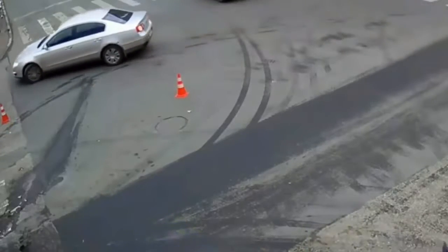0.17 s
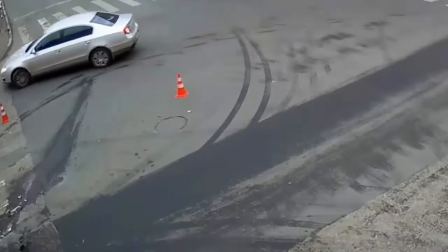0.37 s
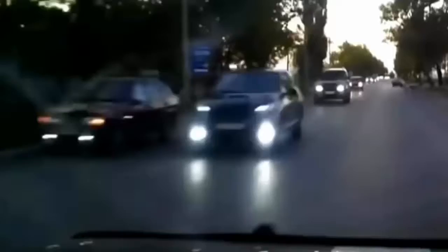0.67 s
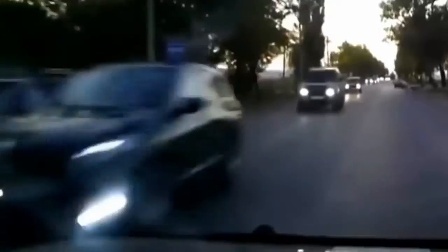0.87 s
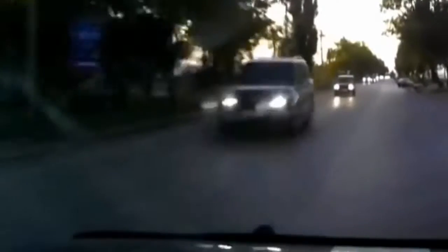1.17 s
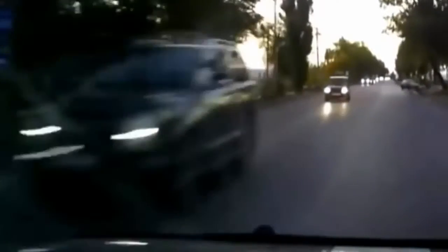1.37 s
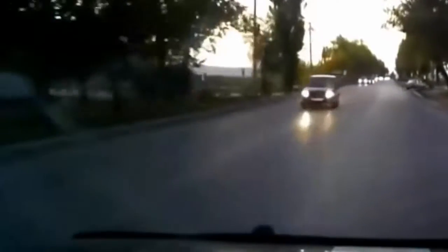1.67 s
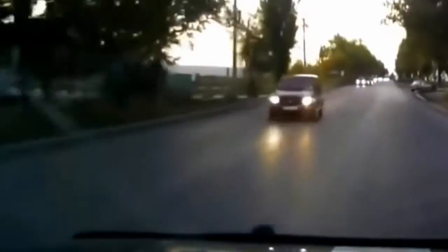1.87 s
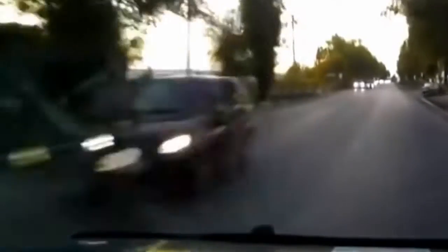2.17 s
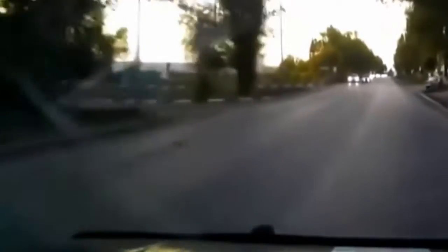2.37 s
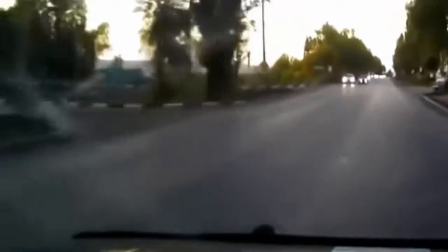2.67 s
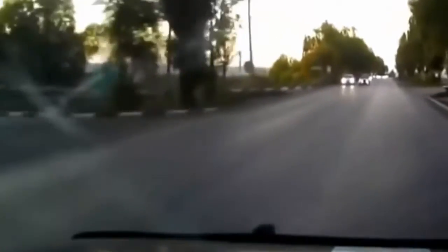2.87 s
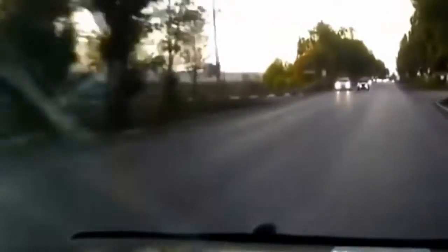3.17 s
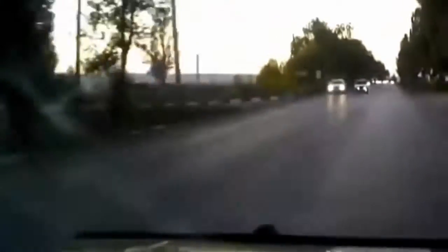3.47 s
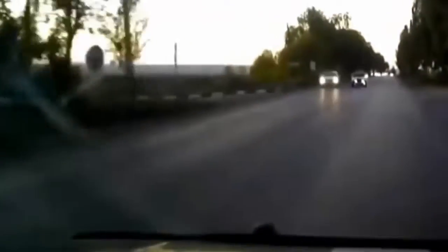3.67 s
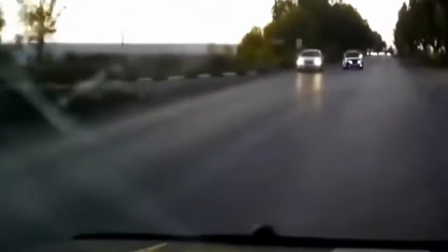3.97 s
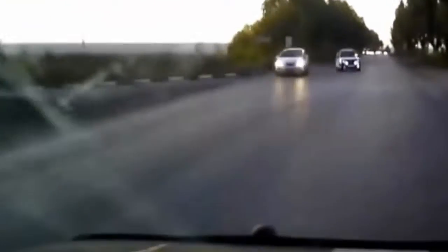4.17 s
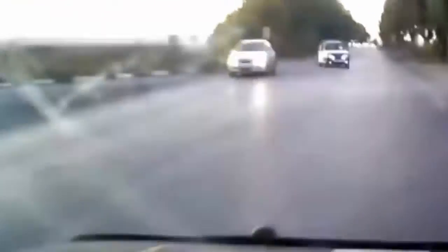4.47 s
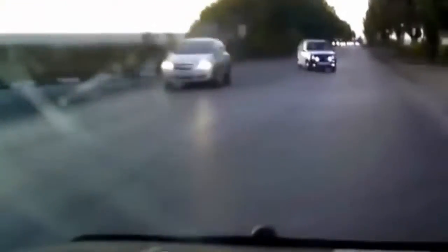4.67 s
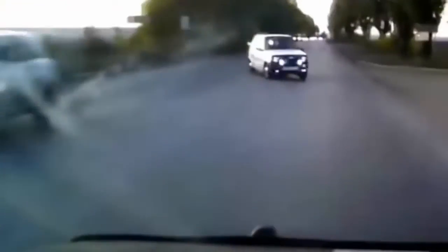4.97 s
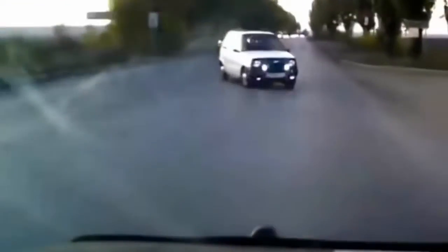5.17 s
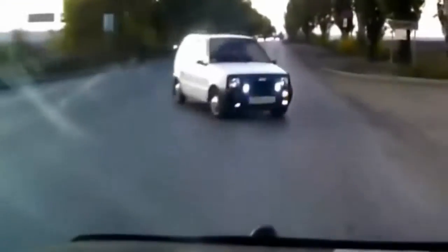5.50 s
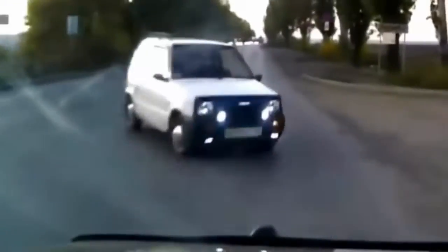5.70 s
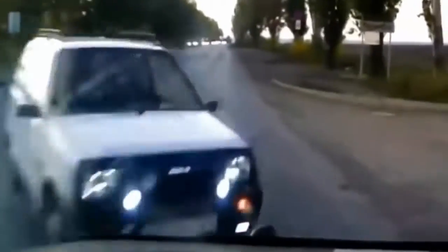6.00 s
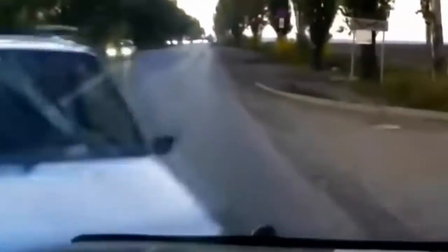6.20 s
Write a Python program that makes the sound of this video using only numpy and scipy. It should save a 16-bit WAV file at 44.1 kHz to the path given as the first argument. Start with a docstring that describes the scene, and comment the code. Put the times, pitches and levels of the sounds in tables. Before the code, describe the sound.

After brief silence, a droning car cabin; hard braking brings loud knocks, ticks, a two-note horn and howling tyres, ending in a distorted crash.

```python
"""Inside a moving car, heard from the dashboard: engine boom, road roar and buzzing trim after a short silence.
The driver brakes hard: loose things knock, sharp ticks crowd in, grit crackles, a two-note horn blares
and the tyres howl. An oncoming car hits the front and overloads the microphone. Engine, horn and tyres
are sums of sines with wandering pitch and level; road, ticks and scrub are coloured noise; trim, grit
and scrapes are random tiny contacts; knocks and crash are noise bursts over decaying thuds."""
import sys
import numpy as np
from scipy import signal
from scipy.fft import rfft, irfft
from scipy.io import wavfile
from scipy.ndimage import uniform_filter1d, minimum_filter1d

SR = 44100
rng = np.random.default_rng(int(sys.argv[2]) if len(sys.argv) > 2 else 0)


def transcribe(u):
    """Save the signal u as a 16-bit wav file named by the first command-line argument.

    u: samples, shape (n,) or (channels, n), limited to [-1, 1]; the rate is SR.
    q: integer samples, one column per channel.
    """
    v = np.clip(np.atleast_2d(u).T, -1, 1)
    q = np.round(v * 32767).astype(np.int16)
    wavfile.write(sys.argv[1], SR, q)


N = 279594
TIME = np.arange(N) / SR

CABIN_ON_S, IMPACT_S = 0.668, 6.26
# Steady speed until the driver lifts off, then an even slowing (share of cruising speed lost per second)
LIFT_S, SLOWING_PER_S = 3.55, 0.145
FIRING_HZ = 45.24  # at cruising speed
# First bite of the brakes
BITE_S, BITE_ATTACK_S, BITE_HOLD_S, BITE_RELEASE_S = 3.97, 0.059, 0.889, 0.048


def undb(db):
    """Decibels to gain."""
    return 10 ** (np.asarray(db) / 20)


def unit(x):
    """Scale to rms 1."""
    return x / np.sqrt(np.mean(x ** 2) + 1e-18)


def curves(table):
    """Each column of a table joined by straight lines in time."""
    seconds, *columns = np.transpose(table)
    return [np.interp(TIME, seconds, column) for column in columns]


def ramp(start, length):
    """Rises from 0 to 1."""
    return np.clip((TIME - start) / length, 0, 1)


def swell(start, length):
    """A rounded rise and fall."""
    return np.sqrt(np.abs(np.sin(np.pi * ramp(start, length))))


def swells(table):
    """Summed envelope of events given as start in seconds, length in seconds, level in dB."""
    return sum(undb(db) * swell(start, length) for start, length, db in table)


def fade(start, t60, rise):
    """Envelope of a blow: a quick rise and an exponential decay, 60 dB down after t60 seconds."""
    decay = np.exp(-np.log(1000) * np.clip((TIME - start) / t60, 0, 2))
    return ramp(start, rise) * decay


def colour(x, spectrum):
    """Causal minimum-phase filter through (Hz, dB) points; the result has rms 1."""
    hz, db = np.transpose(spectrum)
    size = 4096
    grid = np.maximum(np.fft.rfftfreq(size, 1 / SR), 1)
    cepstrum = irfft(np.log(undb(np.interp(np.log(grid), np.log(hz), db))))
    # Folding the cepstrum puts the energy of the response at its start
    cepstrum[1:size // 2] *= 2
    cepstrum[size // 2 + 1:] = 0
    response = irfft(np.exp(rfft(cepstrum)))
    return unit(signal.fftconvolve(x, response)[:len(x)])


def noise(spectrum):
    """Coloured noise of rms 1."""
    return colour(rng.standard_normal(N), spectrum)


def walk(rate):
    """Smooth random wander of rms 1, changing about rate times a second."""
    hold = max(int(SR / rate), 2)
    steps = np.repeat(rng.standard_normal(N // hold + 1), hold)
    smooth = uniform_filter1d(uniform_filter1d(steps, hold), hold)
    return unit(smooth[:N])


def contacts(per_s, scatter_db):
    """Random tiny impacts of either sign and scattered strength."""
    touching = rng.random(N) < per_s / SR
    return touching * rng.choice([-1, 1], N) * undb(scatter_db * rng.standard_normal(N))


def turn(hz):
    """Phase of an oscillator whose rate moves."""
    return 2 * np.pi * np.cumsum(hz) / SR


def firing_hz():
    """The firing rate follows the speed of the car."""
    return FIRING_HZ * (1 - SLOWING_PER_S * np.maximum(TIME - LIFT_S, 0))


def bite():
    """Envelope of the first bite of the brakes."""
    release = ramp(BITE_S + BITE_ATTACK_S + BITE_HOLD_S, BITE_RELEASE_S)
    return ramp(BITE_S, BITE_ATTACK_S) * (1 - release)


def blows(table, spectrum, rise, crackle_db):
    """Each blow is a burst of crackling contacts over the thud of one damped panel."""
    crackle = noise(spectrum) * unit(undb(crackle_db * walk(700)))
    out = 0
    for start, db, t60, thud_hz, thud_db in table:
        thud = undb(thud_db) * np.sqrt(2) * np.sin(2 * np.pi * thud_hz * (TIME - start))
        out = out + undb(db) * fade(start, t60, rise) * (crackle + thud)
    return out


def engine(engine_db=-28, waver_db=3.0, jitter=0.00418):
    """Firings drone in the cabin as engine orders that swell and sink slowly; closing the throttle quiets them."""
    # Cabin boom. Each row: multiple of the firing rate, relative level in dB, change while shifted in dB.
    boom = [(1, 0.5, -4), (1.5, -10.5, -1.5), (2, -1, 0), (3.01, 0, -.5), (4, -4.5, -2.5),
            (4.97, -1.5, 0.5), (6.02, -2, 3.5), (7.43, -2.5, -2.5), (7.95, 1.5, -5.5), (9.13, -7, 3),
            (9.94, -11.5, 8.5)]
    throttle_shut_s, off_throttle_db = 1, -15.5
    # For a while the boom leans on other orders
    shift_s, shift_back_s, shift_glide_s = 1.15, 2.88, 0.26
    shifted = ramp(shift_s, shift_glide_s) - ramp(shift_back_s, shift_glide_s)
    phase = turn(firing_hz() * (1 + jitter * walk(8)))
    orders = 0
    for multiple, db, shift_db in boom:
        level = undb(db + shift_db * shifted + waver_db * walk(4.49))
        orders = orders + level * np.sin(multiple * phase + rng.uniform(0, 2 * np.pi))
    return unit(orders) * undb(engine_db + off_throttle_db * ramp(LIFT_S, throttle_shut_s))


def road(grain_db=1.5, shake_db=0.57):
    """The road shakes the body and the tread rushes over uneven asphalt; both sink as the wheels lock."""
    # Body rumble. Each row: frequency in Hz, density in dB per Hz (only the shape counts).
    rumble_spectrum = [(20, 4), (38, 8.5), (70, 3.5), (110, 2), (220, 2), (340, 2), (430, -1.5), (520, -3),
                       (800, -35.5), (8000, -91)]
    # Tread rush. Each row: frequency in Hz, density in dB per Hz (only the shape counts).
    rush_spectrum = [(300, -4), (550, -4), (900, 1), (1150, -6), (1400, -6), (1850, -12), (2200, -17.5),
                     (2900, -24), (3700, -23), (4500, -28), (5100, -35), (7200, -40.5), (9000, -39),
                     (12500, -52.5), (15000, -65.5)]
    # Bumps that jolt the body. Each row: start in seconds, length in seconds, level in dB.
    bumps = [(4.27, 0.15, -30), (4.8, 0.14, -35), (5.38, 0.085, -29.5)]
    # An oncoming car swishes past. Each row: start in seconds, length in seconds, level in dB.
    passing = [(0.46, 0.54, -37.5)]
    rumble_db, rush_db, bite_hiss_db = -30.5, -32.5, -29.5
    lock_s, locking_s, locked_rumble_db, locked_rush_db = 4.2, 0.97, -8.5, -4.5
    locked = ramp(lock_s, locking_s)
    body = np.hypot(undb(rumble_db + locked_rumble_db * locked), swells(bumps))
    hiss = undb(bite_hiss_db) * bite() + swells(passing)
    tread = np.hypot(undb(rush_db + locked_rush_db * locked), hiss)
    rumble = noise(rumble_spectrum) * body * undb(shake_db * walk(45))
    rush = noise(rush_spectrum) * tread * undb(grain_db * walk(60))
    return rumble + rush


def trim(rest_db=-60, bite_buzz_db=-52):
    """A loose plastic panel slaps unevenly, about twice per firing, and bounces."""
    # Fits of buzzing. Each row: start in seconds, length in seconds, level in dB.
    buzzes = [(1.03, 0.051, -44), (1.08, 0.089, -35.5), (1.21, 0.048, -40.5), (1.345, 0.026, -44),
              (1.43, 0.055, -43.5), (1.915, 0.062, -39.5), (1.99, 0.2, -40), (2.2, 0.078, -39),
              (2.32, 0.041, -43), (3.15, 0.038, -44), (3.32, 0.069, -44), (3.41, 0.086, -39.5),
              (3.56, 0.055, -40.5), (6.17, 0.098, -41.5)]
    # Colour of the buzz. Each row: frequency in Hz, density in dB per Hz (only the shape counts).
    buzz_spectrum = [(500, -7.5), (1400, 7.5), (2700, -10), (3300, -9.5), (3700, 0.5), (4100, -3),
                     (4550, 3), (4850, -11.5), (5150, -20), (5900, -15), (7200, -23.5), (8700, -17.5),
                     (12500, -34.5), (15000, -51)]
    shaking = undb(rest_db) + swells(buzzes) + undb(bite_buzz_db) * bite()
    slap_phase = turn(2 * firing_hz() * (1 + 0.2 * walk(110)))
    slap = np.exp(1.05 * (np.cos(slap_phase) - 1))
    bounces = contacts(per_s=12000 * slap, scatter_db=1.5) * undb(1.2 * walk(90))
    return colour(bounces * np.sqrt(slap), buzz_spectrum) * shaking


def scrapes():
    """Short bright scrapes: dense tiny contacts of small hard things sliding on the plastic dashboard."""
    # Scrapes. Each row: start in seconds, length in seconds, level in dB.
    slides = [(1.03, 0.015, -48), (1.68, 0.031, -52), (3.337, 0.01, -51), (3.425, 0.021, -43),
              (3.487, 0.019, -49), (5.1, 0.025, -45)]
    # Colour of the scrapes. Each row: frequency in Hz, relative level in dB.
    scrape_spectrum = [(2000, -7), (4500, -1), (7200, -6.5), (9000, -3.5), (12500, -21), (14500, -34)]
    return colour(contacts(per_s=3700, scatter_db=7.5), scrape_spectrum) * swells(slides)


def knocks():
    """Loose things are thrown against the dashboard, which crackles and thuds."""
    # Knocks. Each row: start in seconds, level in dB, ring time in seconds,
    # thud pitch in Hz, thud level relative to the crackle in dB.
    knock_table = [(1.040, -22, 0.042, 866, -1), (1.110, -23, 0.03, 830, 4), (1.131, -19.5, 0.035, 855, 3),
                   (1.400, -24, 0.022, 764, 6), (3.069, -29.5, 0.017, 606, 9),
                   (3.675, -19, 0.016, 770, 7.5), (3.765, -11.5, 0.016, 920, 1.5),
                   (3.811, 11, 0.018, 282, -4), (3.825, -24, 0.0095, 1400, -8.5),
                   (3.8565, -4.5, 0.03, 875, -5), (3.918, -24.5, 0.023, 765, 11.5),
                   (3.9495, 3.5, 0.021, 877, -4.5), (4.002, -10, 0.048, 564, 3.5)]
    # Colour of the crackle. Each row: frequency in Hz, density in dB per Hz (only the shape counts).
    dash_spectrum = [(150, -1.5), (500, 3.5), (900, 8), (1450, 4.5), (2100, -1), (2600, -5.5), (4300, -3),
                     (5600, -13), (7000, -27.5), (8500, -18.5), (13000, -36.5), (16000, -53.5)]
    return blows(knock_table, dash_spectrum, rise=0.0042, crackle_db=-0.5)


def ticks(tick_t60=0.019):
    """Sharp, short ticks of coloured noise, many about 21 ms apart, crowd the braking."""
    # Sharp ticks. Each row: start in seconds, level in dB.
    tick_times = [(3.674, -27), (3.7433, -24), (3.842, -30), (3.985, -31.5), (4.035, -20), (4.058, -22),
                  (4.1815, -24.5), (4.2033, -15.5), (4.2235, -23), (4.25, -27), (4.289, -25.5),
                  (4.309, -20), (4.3503, -17), (4.396, -19), (4.465, -19), (4.486, -22.5), (4.5073, -21.5),
                  (4.532, -13), (4.557, -13.5), (4.578, -22.5), (4.608, -14.5), (4.627, -21), (4.708, -27),
                  (4.766, -24), (4.78, -24.5), (4.848, -25.5), (4.911, -14), (4.926, -22.5), (5.057, -41),
                  (5.198, -31), (5.316, -31), (5.339, -24.5), (5.4114, -25.5), (5.5205, -27),
                  (5.547, -27.5), (5.771, -34), (5.883, -31), (5.9875, -28), (6.087, -30), (6.129, -29.5),
                  (6.1885, -20.5), (6.212, -27), (6.232, -29)]
    # Colour of the ticks. Each row: frequency in Hz, density in dB per Hz (only the shape counts).
    tick_spectrum = [(500, -10), (1400, 9.5), (2700, -5.5), (3400, -1), (3900, -3.5), (4200, -1),
                     (4580, 4.5), (4900, -11), (5600, -7.5), (7200, -25.5), (8700, -19.5), (12500, -35.5),
                     (15000, -33)]
    envelope = sum(undb(db) * fade(start, tick_t60, rise=0.0014) for start, db in tick_times)
    return noise(tick_spectrum) * envelope


def howl(hz, db, octave_db, third_db=-13, fourth_db=-24, echo=0.53, smear=0.085):
    """Tread sticks and slips: a juddering tone beats with its echo off the road; its overtones smear and dull."""
    phase = turn(hz * (1 + 0.015 * walk(55) + 0.019 * walk(260)))
    # The third and fourth partials fade late in the slide
    dulling_db = -9 * ramp(5.4, 0.3)
    third_level_db = third_db + dulling_db + (db + octave_db) / 2
    fourth_level_db = fourth_db + dulling_db + octave_db
    out = 0
    for k, partial_db in enumerate([db, octave_db, third_level_db, fourth_level_db], 1):
        direct = k * phase + smear * k ** 2 * walk(330) + rng.uniform(0, 2 * np.pi)
        # The echo is a copy whose phase wanders
        lag = turn(30 * k * walk(50)) + rng.uniform(0, 2 * np.pi)
        judder = unit(undb(1.1 * k * walk(100)))
        out = out + undb(partial_db) * judder * (np.sin(direct) + echo * np.sin(direct + lag))
    return out * np.sqrt(2 / (1 + echo ** 2))


def scrub(scrub_db=-32):
    """Rubber scrubs over asphalt: a band of noise that fades in."""
    # Colour of the scrub. Each row: frequency in Hz, density in dB per Hz (only the shape counts).
    scrub_spectrum = [(350, -24.5), (520, -5.5), (640, 1.5), (820, 8), (950, -4), (1080, -6.5), (1330, 3.5),
                      (1550, -5), (1720, -8), (2030, -12.5), (2200, -18.5), (2550, -21.5), (2800, -28.5),
                      (3400, -33), (12000, -80)]
    return undb(scrub_db) * noise(scrub_spectrum) * ramp(3.91, 0.41)


def squeal():
    """As the wheels lock, a ragged squeal sinks ever faster while its octave grows."""
    start_s, attack_s, sink_s = 3.98, 0.16, 0.95
    squeal_hz, fall_hz = 932, 265.2
    squeal_db, octave_db, octave_growth_db = -28, -40, 16.5
    sunk = ramp(start_s, sink_s) ** 2
    hz = (squeal_hz - fall_hz * sunk) * (1 + 0.035 * walk(35) + 0.022 * walk(300))
    tone = howl(hz, squeal_db, octave_db + octave_growth_db * sunk)
    return tone * ramp(start_s, attack_s) * (1 - ramp(start_s + sink_s, 0.032))


def lower_tyre(octave_below_db=-12):
    """The lower of two howling tyres, its octave a fixed step weaker."""
    # Howl. Each row: time in seconds, stick-slip rate in Hz, level in dB.
    lower_howl = [(4.62, 700, -35), (4.65, 677, -24), (4.69, 687, -37), (4.73, 714.5, -29),
                  (4.78, 644.5, -27), (4.84, 640, -37), (4.92, 660, -28), (5.0, 587.5, -42),
                  (5.06, 555, -26), (5.14, 570, -36.5), (5.21, 573, -25.5), (5.27, 567.5, -28),
                  (5.35, 589, -27), (5.44, 596, -42), (5.5, 585, -25), (5.53, 562.3, -25.5),
                  (5.58, 600, -31), (5.76, 609.7, -36), (5.86, 595.3, -24.5), (5.95, 596, -29.5),
                  (6.06, 594, -27), (6.25, 600, -29)]
    hz, db = curves(lower_howl)
    return howl(hz, db, db + octave_below_db) * ramp(lower_howl[0][0], 0.018)


def higher_tyre(gain_db=-0.2):
    """The higher of two howling tyres; its grip comes and goes."""
    # Pitch. Each row: time in seconds, stick-slip rate in Hz.
    rate = [(4.95, 675), (4.985, 640), (5.03, 672), (5.08, 638), (5.13, 672), (5.18, 645), (5.24, 650),
            (5.3, 630), (5.37, 617), (5.43, 642), (5.52, 634), (5.62, 646), (5.69, 668), (5.72, 645),
            (5.76, 662), (5.81, 642), (5.9, 636), (5.98, 634), (6.04, 615), (6.11, 641), (6.15, 620),
            (6.2, 622), (6.23, 662), (6.26, 655)]
    # Grip. Each row: time in seconds, level in dB, level of the octave in dB (both before gain_db).
    grip = [(4.95, -28, -36), (4.982, -30, -21.5), (5.012, -32, -31.5), (5.054, -27, -27.5),
            (5.084, -38, -27), (5.128, -28.5, -28), (5.208, -36, -27), (5.23, -37, -31), (5.252, -33, -27),
            (5.336, -32, -21.5), (5.358, -33, -27), (5.394, -19.5, -23), (5.43, -20, -22),
            (5.448, -25, -28), (5.482, -21, -26), (5.518, -33, -27), (5.552, -24.5, -26),
            (5.598, -25.5, -33), (5.62, -20, -28), (5.694, -32, -35), (5.716, -27, -23), (5.752, -29, -35),
            (5.792, -28, -27), (5.814, -31, -33), (5.886, -24, -23), (5.96, -31, -30), (5.988, -25, -29.5),
            (6.01, -29, -32), (6.106, -24, -25), (6.212, -27, -29), (6.244, -20, -26), (6.26, -26, -21.5)]
    return undb(gain_db) * howl(*curves(rate), *curves(grip)) * ramp(grip[0][0], 0.02)


def chirp():
    """One short, higher chirp of a tyre."""
    return swell(5.617, 0.084) * howl(hz=900, db=-29.5, octave_db=-46.5)


def skid():
    """The squeal sinks while a lower howl joins it; a higher howl follows, over the scrub, until the impact."""
    sliding = scrub() + squeal() + lower_tyre() + higher_tyre() + chirp()
    return sliding * (1 - ramp(IMPACT_S, 0.056))


def grit(bite_db=-39, sliding_db=-58):
    """Grit crackles under the braking wheels in uneven flurries of contacts, strongest while the brakes bite."""
    # Colour of the grit. Each row: frequency in Hz, density in dB per Hz (only the shape counts).
    grit_spectrum = [(500, -10), (1400, 7.5), (2500, 5.5), (3400, 1.5), (3900, 2.5), (4250, -4.5),
                     (4580, 3.5), (4900, -8.5), (5600, -5.5), (7200, -19.5), (8700, -20), (12500, -26.5),
                     (15000, -27)]
    strength = undb(bite_db) * bite() + undb(sliding_db) * ramp(BITE_S, BITE_ATTACK_S)
    stones = contacts(per_s=450, scatter_db=4) * undb(3 * walk(170))
    return colour(stones, grit_spectrum) * strength


def horn(jitter=0.00071, flutter_db=1.5, gain_db=2.0):
    """Two diaphragm horns sound together, each partial slightly rough, most of the sound in low harmonics."""
    # Horns. Each row: pitch in Hz, list of the level of each harmonic in dB (before gain_db).
    horns = [(473.2, [-31.5, -21.5, -31, -43, -45.5, -54.5, -68, -65, -58]), (433, [-35, -33, -39, -42.5])]
    on_s, off_s = 4.018, 4.94
    out = 0
    for hz, harmonics in horns:
        phase = turn(hz * (1 + jitter * walk(39.9)))
        for k, db in enumerate(harmonics, 1):
            rough = unit(undb(0.5 * walk(170)))
            level = np.sqrt(2) * undb(db + flutter_db * walk(18))
            out = out + level * rough * np.sin(k * phase + rng.uniform(0, 2 * np.pi))
    return out * undb(gain_db) * ramp(on_s, 0.03) * (1 - ramp(off_s, 0.05))


def squeak(squeak_hz=3880, squeak_db=-45):
    """One brief, thin squeak of the trim: a single unsteady sine."""
    tone = np.sin(turn(squeak_hz * (1 + 0.00595 * walk(200))))
    return undb(squeak_db) * swell(5.595, 0.023) * tone


def crash():
    """The collision: a quick run of blows on ringing, crackling metal."""
    # Blows. Each row: start in seconds, level in dB, ring time in seconds,
    # thud pitch in Hz, thud level relative to the crackle in dB.
    crash_table = [(6.261, -20.5, 0.076, 290.4, 15.5), (6.274, -8.5, 0.11, 705, -2.5),
                   (6.290, -9, 0.071, 44, 1.5), (6.304, -8, 0.064, 300, -3),
                   (6.319, -12, 0.11, 183.6, -1.5), (6.332, -5, 0.13, 780, -0.5)]
    # Colour of the crackle. Each row: frequency in Hz, density in dB per Hz (only the shape counts).
    metal_spectrum = [(40, -1), (250, 6.5), (800, 1.5), (1600, 3), (2800, -6), (4300, -4), (6000, -13.5),
                      (9000, -20), (15000, -27)]
    return blows(crash_table, metal_spectrum, rise=0.0014, crackle_db=3.0)


def limiter(x, limit_db=-13.3, range_db=-5, hold_s=0.004, lag_s=0.0097):
    """Turns loud stretches down by 5 dB at most; its lag lets sudden blows through."""
    wanted = np.clip(undb(limit_db) / (np.abs(x) + 1e-9), undb(range_db), 1)
    held = minimum_filter1d(wanted, max(int(hold_s * SR), 1))
    pole = np.exp(-1 / (lag_s * SR))
    reduction = signal.lfilter([1 - pole], [1, -pole], 1 - held)
    return x * (1 - reduction)


def scene():
    """Silence, then the cabin with the drive, the braking and the collision."""
    driving = engine() + road() + trim() + scrapes() + knocks()
    braking = ticks() + skid() + grit() + horn() + squeak()
    cabin = driving + braking + crash()
    return (cabin * ramp(CABIN_ON_S, 0.0021))[None]


def record(dry, overload_db=-12, knee=9, dull_hz=9500, low_cut_hz=18, top_hz=15400):
    """The microphone drops the deepest bass, limits loud stretches and saturates; the top is dulled and cut."""
    bass_cut = signal.butter(2, low_cut_hz, "high", fs=SR, output="sos")
    limited = limiter(signal.sosfilt(bass_cut, dry))
    ceiling = undb(overload_db)
    squashed = limited / (1 + np.abs(limited / ceiling) ** knee) ** (1 / knee)
    dulled = signal.sosfilt(signal.butter(2, dull_hz, fs=SR, output="sos"), squashed)
    return signal.sosfilt(signal.ellip(8, 0.2, 80, top_hz, fs=SR, output="sos"), dulled)


dry = scene()
out = record(dry)
transcribe(out)
```